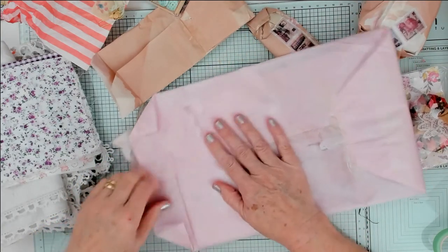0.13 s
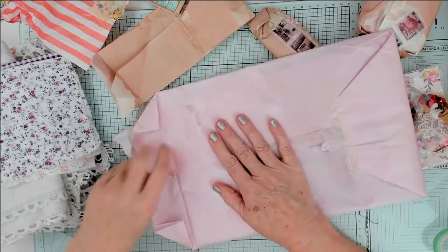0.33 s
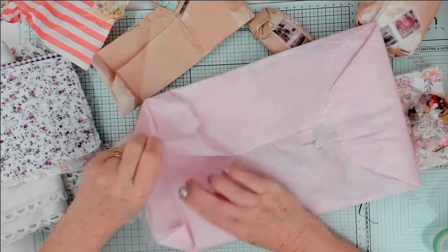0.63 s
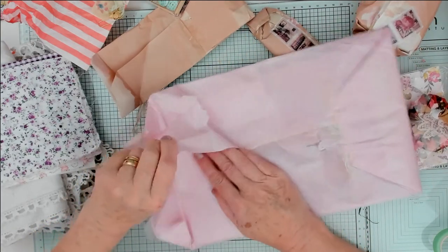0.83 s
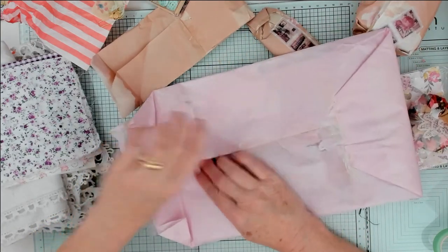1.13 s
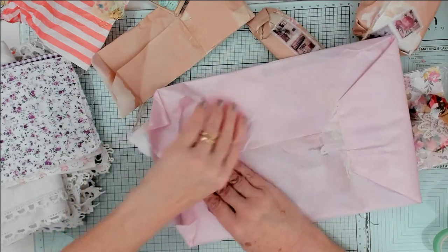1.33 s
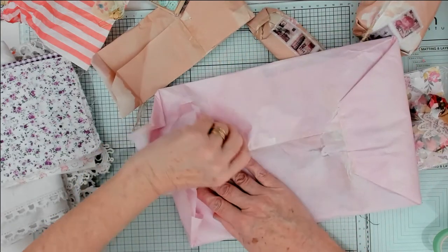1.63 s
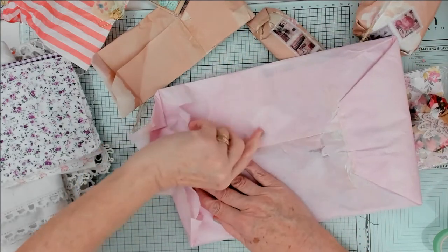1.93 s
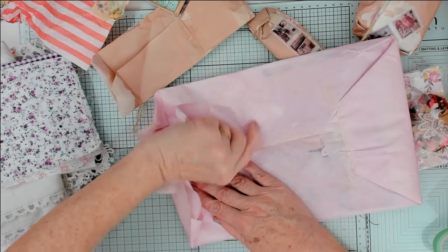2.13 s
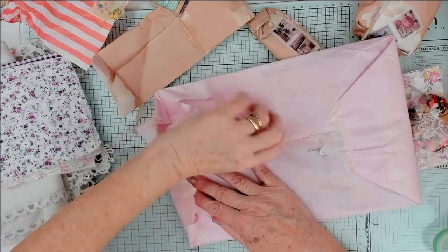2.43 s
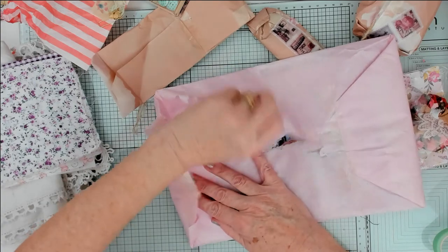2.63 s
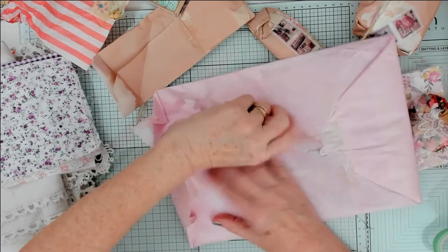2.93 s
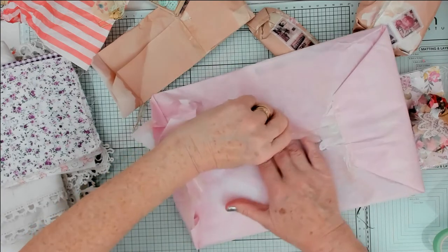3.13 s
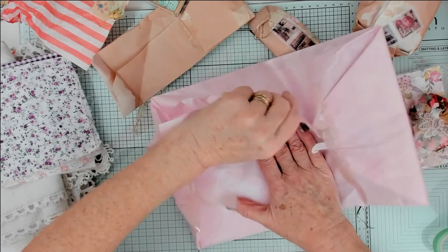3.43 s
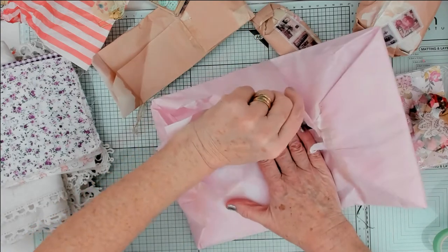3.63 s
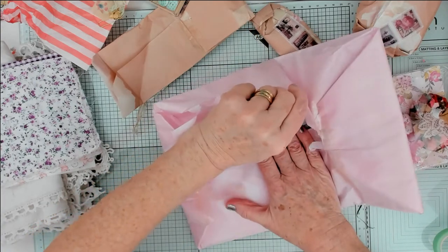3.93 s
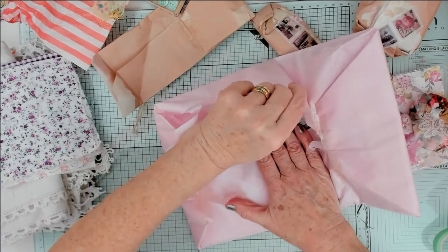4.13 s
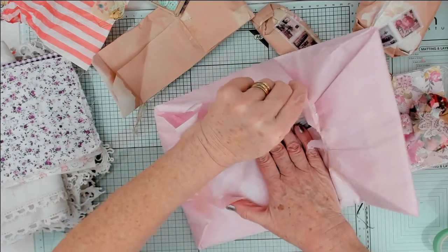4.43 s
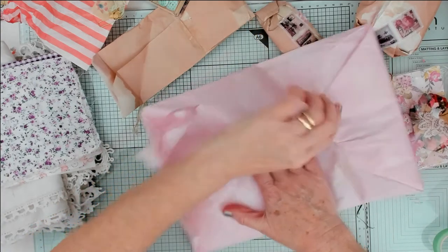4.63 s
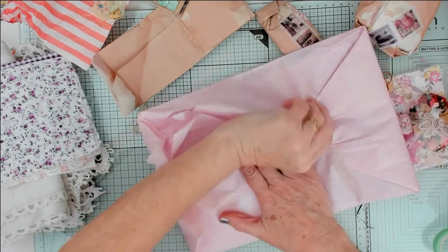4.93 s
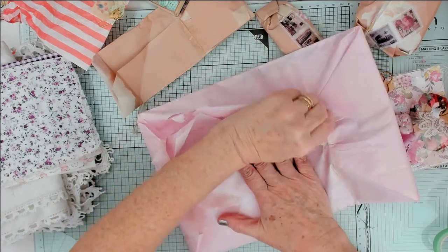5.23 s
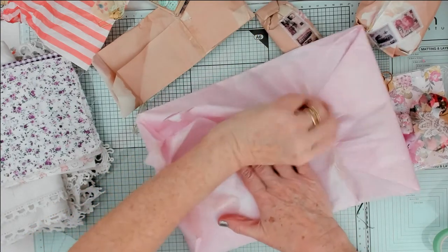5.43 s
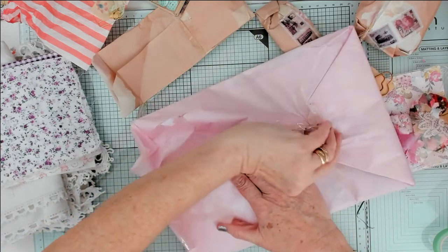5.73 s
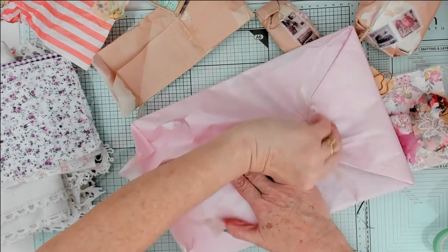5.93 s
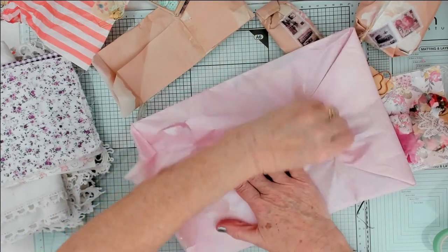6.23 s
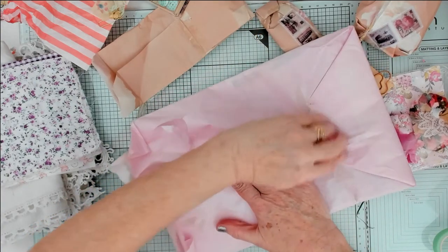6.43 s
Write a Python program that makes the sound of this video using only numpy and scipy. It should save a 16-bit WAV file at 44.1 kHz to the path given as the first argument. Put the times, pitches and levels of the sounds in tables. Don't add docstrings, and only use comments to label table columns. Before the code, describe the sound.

Close, bright tissue-paper crackling as fingers fumble, rip and crease a parcel's wrapping, with low hollow pops underneath in a quiet small room.

```python
import sys
import numpy as np
from scipy import signal
from scipy.io import wavfile
from scipy.ndimage import uniform_filter1d, minimum_filter1d

SR = 44100
rng = np.random.default_rng(int(sys.argv[2]) if len(sys.argv) > 2 else 0)


def field_ratio(decibels):
    return 10 ** (np.asarray(decibels, dtype=float) / 20)


def digitize_waveform(pressure):
    field = np.atleast_2d(pressure).T
    bounded = np.clip(field, -1, 1)
    quanta = np.round(bounded * 32767).astype(np.int16)
    wavfile.write(sys.argv[1], SR, quanta)


N = 290266

# frequency_hz, density_db (per Hz)
SHEET = [(1050, -21), (1450, -16.5), (2500, -0.5), (2950, 0), (7570, -3.5), (10000, -6.5), (16000, -25.5)]
# pitch_hz, width_hz, level_db
PARCEL = [(703, 69, -1), (871, 52, 10.5), (1042, 214, 6), (1667, 143, 8.5), (2460, 265, 4),
          (3950, 190, -10.5)]


def evened(x):
    return x / np.sqrt(np.mean(x ** 2) + 1e-20)


def peaked(x):
    return x / np.sqrt(uniform_filter1d(x ** 2, size=88).max())


def curve(rows):
    s, *columns = np.transpose(rows)
    return [np.interp(np.arange(N) / SR, s, c) for c in columns]


def read(points, hz):
    f, value = np.transpose(points)
    return np.interp(np.log(hz + 1), np.log(f + 1), value)


def colour(x, points, size=1024):
    gain_db = read(points, abs(np.fft.fftfreq(size, 1 / SR)))
    log_gain = np.log(field_ratio(np.maximum(gain_db, -100)))
    response = np.exp(np.conj(signal.hilbert(log_gain)))
    taps = np.fft.ifft(response).real[:size // 2]
    taps = taps.reshape((1,) * (x.ndim - 1) + (-1,))
    return signal.oaconvolve(x, taps, axes=-1)[..., :x.shape[-1]]


def ring(x, hz, width):
    return signal.lfilter(*signal.iirpeak(hz, hz / width, SR), x)


def body(x, modes):
    out = 0
    for k, (hz, width, db) in enumerate(modes):
        out = out + (-1) ** k * field_ratio(db) * ring(x, hz, width)
    return out


def clicks(luck, per_s, spread_db):
    size = field_ratio(-spread_db * np.log(luck[..., 1] + 1 / 100))
    sign = np.sign(luck[..., 2] - 0.5)
    return size * sign * (luck[..., 0] < per_s / SR)


def volley(chance, length, per_s):
    u = np.arange(len(chance)) / SR / np.clip(length, 0.004, 0.1)
    swell = 0.026 + 1 - np.exp(-u / 0.03)
    drive = clicks(chance, per_s, spread_db=3.5) * swell * field_ratio(-60 * u ** 1.38)
    main_s = np.clip(0.06 * length, 0.0012, 0.003)
    drive[round(main_s * SR)] += 5.5
    return drive


def stillness():
    # frequency_hz, density_db (per Hz)
    air_spectrum = [(30, 5), (100, 7.5), (165, -1), (900, 10.5), (3000, 1), (8000, -2.5), (12000, -17),
                    (16000, -28)]
    # time_s, level_db
    hum_course = [(0, -85), (3, -82), (5.8, -81)]
    tone = np.sin(2 * np.pi * 50 * np.arange(N) / SR)
    hum = tone + 1.17 * evened(ring(rng.standard_normal(N), 47.0, 12))
    air = field_ratio(-61) * evened(colour(rng.standard_normal(N), air_spectrum, size=4096))
    return air + field_ratio(curve(hum_course)[0]) * evened(hum)


def room(x):
    # frequency_hz, t60_s
    decay = [(300, 0.19), (1000, 0.11), (3000, 0.085), (10000, 0.078)]
    taps = np.zeros(SR // 2)
    at = np.arange(300, len(taps) - 20, 20)
    taps[at + rng.integers(0, 20, len(at))] = rng.choice([-1.0, 1.0], len(at))
    hz, t, z = signal.stft(taps, SR, nperseg=256)
    fall = field_ratio(-60 * t / read(decay, hz)[:, None])
    tail = signal.istft(z * fall, SR, nperseg=256)[1]
    tail *= field_ratio(-14) / np.linalg.norm(tail)
    tail[0] += 1
    return signal.oaconvolve(x, tail / np.linalg.norm(tail))[:N]


def pops():
    # start_s, level_db,
    # pitch_hz, length_s
    fold_pops = [(0.248, -36.5, 362, 0.066), (0.71, -27, 710, 0.1), (0.967, -28, 674, 0.07),
                 (2.269, -26.5, 440, 0.049), (3.334, -24, 790, 0.078), (3.416, -14.5, 376, 0.022),
                 (3.918, -19.5, 750, 0.12), (4.02, -22.5, 720, 0.042), (4.041, -17.5, 720, 0.026),
                 (4.298, -24.5, 453, 0.035), (4.556, -17, 840, 0.1), (4.816, -28, 394, 0.065),
                 (4.946, -11, 1030, 0.12), (2.835, -32.5, 285, 0.12), (2.977, -38, 385, 0.017),
                 (2.977, -38, 1040, 0.014), (0.15, -54, 305, 0.045), (0.69, -38, 270, 0.13),
                 (1.185, -28.5, 850, 0.11), (3.67, -47, 222, 0.054), (5.669, -30.5, 880, 0.0317)]
    # start_s, level_db, pitch_hz
    knocks = [
        (0.563, -53, 128),
        (0.758, -53, 139),
        (2.84, -50, 113),
        (3.414, -38.5, 106),
        (3.934, -46, 236),
        (4.56, -43, 220),
        (4.784, -37, 210),
        (4.998, -50, 107),
    ]
    rows = list(fold_pops) + [(s, db + 4.0, hz, 0.1) for s, db, hz in knocks]
    out = np.zeros(N + 6000)
    for (s, db, hz, length), chance in zip(rows, rng.random((len(rows), 6000, 3))):
        drive = volley(chance, length, per_s=2800)
        flap = ring(ring(drive, hz, 0.28 * hz), hz, 1.2 * hz)
        out[round(s * SR):][:len(flap)] += field_ratio(db - 6.0) * peaked(flap)
    return out[:N]


def flicks():
    # start_s, level_db
    broad_flicks = [(0.1457, -24.5), (0.487, -28), (0.7478, -11.5), (0.921, -31), (1.2874, -15.5),
                    (1.51, -27), (1.9534, -8), (2.4726, -21), (2.76, -19), (2.9276, -27), (3.1015, -26),
                    (3.2266, -15), (3.9804, -29), (3.9902, -17), (4.1455, -25.5), (4.2484, -18),
                    (4.267, -22), (4.3958, -28.5), (4.5246, -31), (5.2176, -20.5), (5.2486, -25),
                    (5.8736, -29), (5.89, -28), (5.94, -21.5), (6.3334, -32)]
    thin_flicks = [(0.1852, -28), (0.2034, -29), (1.158, -22.5), (1.198, -25), (1.2127, -21), (1.736, -12),
                   (2.0254, -25), (2.4036, -15), (3.899, -22), (4.885, -25), (4.9796, -22), (5.4635, -36),
                   (5.4812, -18.5)]
    lowest_hz = [2300, 5320]
    rows = [(*row, hz) for kind, hz in zip([broad_flicks, thin_flicks], lowest_hz) for row in kind]
    out = np.zeros(N + 900)
    for (s, db, low_hz), chance in zip(rows, rng.random((len(rows), 900, 3))):
        drive = volley(chance, 0.024, per_s=8300)
        pitches = low_hz * 2.53 ** chance[0]
        rings = sum(ring(ring(drive, hz, 0.17 * hz), hz, hz) for hz in pitches)
        sound = peaked(rings) + 0.67 * peaked(colour(drive, SHEET))
        out[round(s * SR):][:len(drive)] += field_ratio(db - 12.0) * peaked(sound)
    return out[:N]


def buckles():
    # start_s, level_db, pitch_hz
    hollow = [(0.2607, -33, 1680), (0.7479, -30, 1640.0), (1.2308, -24, 1330), (1.2764, -27, 2070),
              (1.3969, -23, 2020.0), (1.4049, -35, 1940.0), (1.5086, -25, 2170), (1.5744, -28, 2220),
              (1.8228, -33, 1660.0), (1.895, -18.5, 1580), (1.9587, -19.5, 1530.0), (2.1554, -15.5, 2320),
              (2.6164, -15, 1960), (3.0016, -33, 2240.0), (3.0406, -20, 2170), (3.117, -34, 2300),
              (3.1427, -23, 1710), (3.3279, -22, 1690), (3.3721, -11, 1610), (3.3897, -11, 2230),
              (3.4506, -21, 1640.0), (3.7961, -34, 2000.0), (4.299, -18, 1445), (4.6617, -32.5, 1720.0),
              (4.9445, -25, 1710), (5.1401, -28, 1490.0), (5.4281, -33, 1690), (5.4488, -29, 1600),
              (5.5139, -32, 1480), (6.025, -20.5, 1950), (6.054, -26, 1510), (6.0768, -26.5, 1700.0),
              (6.1966, -31, 2020.0), (6.2251, -28, 1490), (6.3967, -28, 1460)]
    slack = [(0.3904, -34, 3320.0), (0.5384, -21.5, 3330), (0.5609, -13.5, 2320), (0.586, -25, 4410.0),
             (0.605, -21.5, 3440), (0.6516, -26.5, 2370.0), (1.01, -26, 2850), (1.07, -29, 2360),
             (1.251, -32, 2300), (1.3002, -34, 2840.0), (1.318, -27, 2690.0), (1.339, -25.5, 2370),
             (1.4673, -37, 3360.0), (1.5593, -29, 2480.0), (1.6404, -9.5, 2590), (1.6887, -25, 2430.0),
             (2.1804, -17.5, 3880.0), (2.221, -21, 3470.0), (2.373, -33, 3060.0), (2.4381, -34, 3660.0),
             (2.518, -35.5, 2480), (2.6504, -11.5, 2270), (2.7967, -31, 2350), (2.9566, -30, 2710.0),
             (3.201, -28, 2620), (3.2316, -33, 4010.0), (3.309, -23, 2970.0), (3.3187, -31, 3940.0),
             (3.325, -23.0, 3830.0), (3.537, -26, 2350), (3.6393, -37, 3120.0), (3.922, -25.5, 3430),
             (4.113, -29, 3200), (4.1794, -31, 3360), (4.2057, -32, 3350), (4.5573, -32, 3830.0),
             (4.6802, -29, 2950.0), (4.706, -26, 2430.0), (4.7708, -22.5, 2540), (4.8249, -22, 3440),
             (4.9447, -25, 4410.0), (4.979, -29, 4220), (5.067, -28, 2550), (6.1358, -24.5, 3220),
             (6.216, -37, 3640.0), (6.306, -34, 3490.0), (6.5367, -35.5, 3680)]
    taut = [(0.2474, -21.5, 8050), (0.6024, -25, 8400.0), (0.6316, -21, 6870.0), (0.6944, -34, 7860.0),
            (0.7636, -22.5, 7410.0), (1.228, -25, 6290.0), (1.2647, -29, 8510.0), (1.318, -30, 6630.0),
            (1.5607, -26, 7150), (1.5763, -25.5, 10400), (1.738, -37, 4570.0), (1.874, -31, 6910.0),
            (1.917, -14, 6460), (1.9606, -20, 4570.0), (1.983, -13, 5200), (2.0085, -19, 6760),
            (2.2684, -20, 9860.0), (2.3078, -23.5, 9710.0), (2.334, -19, 5600.0), (2.41, -17, 6550),
            (2.6275, -12, 7600.0), (2.6595, -14, 8600), (2.676, -21.5, 7950.0), (2.739, -30, 4650.0),
            (2.8101, -22, 4600), (3.3742, -13, 7200), (3.5563, -21, 6500.0), (3.6406, -30, 8290.0),
            (3.6522, -30, 8160.0), (3.7, -29, 8070.0), (3.816, -36, 12000), (3.752, -28, 5600),
            (3.76, -31, 9390.0), (4.1927, -35, 12400), (4.2407, -28, 6200), (4.292, -29, 7240.0),
            (4.6298, -27, 6700), (4.7932, -21, 6120.0), (5.0123, -20, 7200), (5.05, -28, 6940),
            (5.0803, -31, 6780.0), (5.3859, -18.5, 4930), (5.5328, -17.5, 7900), (5.627, -27, 5960),
            (5.8265, -29, 5000.0), (5.832, -33, 7690.0), (6.0548, -37, 7750.0)]
    lengths = [0.014, 0.028, 0.011]
    widths = [0.095, 0.11, 0.18]
    rows = [(*row, *rule) for kind, *rule in zip([hollow, slack, taut], lengths, widths) for row in kind]
    out = np.zeros(N + 900)
    for (s, db, hz, length, width), chance in zip(rows, rng.random((len(rows), 900, 3))):
        drive = volley(chance, length, per_s=8300)
        sound = peaked(ring(drive, hz, width * hz)) + field_ratio(-13) * peaked(colour(drive, SHEET))
        out[round(s * SR):][:len(drive)] += field_ratio(db - 0.5) * peaked(sound)
    return out[:N]


def hands():
    # peak_s, rustle_db, parcel_db (re rustle), build_s, fade_s
    pulls = [(0, -31.5, -6.5, .05, 0.089), (.577, -29, -3, 0.047, 0.24), (.774, -31, 2, 0.24, 0.054),
             (1.005, -34.5, -4.5, 0.086, 0.1), (1.346, -34.5, -2.5, 0.19, 0.059),
             (1.463, -37, -4.5, 0.19, 0.97), (1.65, -22.5, -5.5, 0.022, 0.028),
             (1.999, -22, -2.5, 0.058, 0.037), (2.11, -31.5, -12, 0.005, 0.1),
             (2.169, -22, -6.5, 0.073, 0.24), (2.413, -35, -4, 0.54, 0.067),
             (2.604, -19.5, -16, 0.011, 0.093), (2.646, -16.5, 0, 0.069, 0.093),
             (2.833, -34, 3.5, 0.16, 0.087), (3.29, -25, -19, 0.041, 0.35), (3.363, -30.5, 6.5, 0.18, 0.24),
             (3.542, -31, -3.5, 0.25, 0.11), (4.309, -37, -17, 0.12, 0.12), (4.584, -34.5, 3, 0.1, 0.31),
             (5.009, -28, 5, 0.15, 0.048), (5.557, -32.5, -4, 0.061, 0.034), (6.038, -31, -6, 0.071, 0.25)]
    # peak_s, rustle_db, parcel_db (re rustle), build_s, fade_s
    more_pulls = [(.259, -40.5, -21, 0.14, 0.18), (.441, -35, -23, 0.095, 0.045),
                  (.859, -38, 0.5, 0.12, 0.049), (1.225, -32, -1.5, 0.057, 0.21), (1.75, -40, 1, 0.27, 0.72),
                  (2.035, -36, 0, .05, 0.035), (2.99, -43, -10, 0.12, 0.22), (6.3, -42, 4.5, 0.12, 0.093),
                  (3.153, -41, 1, 0.069, 0.63), (3.69, -37, -6.5, 0.22, 0.3), (3.831, -36, -11, 0.31, 0.063),
                  (3.933, -39, 5, 0.049, 0.059), (4.035, -37, -7, 0.13, 0.051),
                  (4.14, -38, -12, 0.062, 0.024), (4.186, -39.5, -8.5, 0.012, 0.25),
                  (5.07, -34.5, -0.5, 0.13, 0.22), (5.397, -38, -1, 0.016, 0.26),
                  (5.83, -45.5, -4.5, 0.059, 0.17), (5.958, -39, -6.5, 0.038, 0.38),
                  (.968, -32.5, -3.5, 0.012, 0.16), (1.13, -37, -8, .12, 0.074),
                  (4.885, -42, 5, 0.027, 0.046), (6.42, -38, 4, 0.053, 0.05),
                  (6.532, -42.5, -2.5, 0.018, 0.037)]
    t = np.arange(0, N + 64, 64) / SR
    s, db, parcel_db, build, fade = np.transpose(list(pulls) + list(more_pulls))[:, :, None]
    span = np.where(t < s, np.maximum(build, 0.005), np.maximum(fade, 0.005))
    away = abs(t - s) / span
    loss_db = 21 * away ** np.where(t < s, 1.5, 1.7)
    rustle_db = (db - loss_db).max(0)
    ring_db = (db + parcel_db - 1.53 * loss_db).max(0)
    still_db = -65
    return curve(np.transpose([t, *np.maximum((rustle_db, ring_db), still_db)]))


def parcel(drive):
    spot = rng.integers(0, 4, N // 1024 + 1).repeat(1024)[:N]
    out = np.zeros(N)
    for k, luck in enumerate(rng.random((4, len(PARCEL)))):
        modes = [(hz * (1 + 0.16 * (p - 0.5)), width, db - 6 * p)
                 for (hz, width, db), p in zip(PARCEL, luck)]
        out += body(drive * (spot == k), modes)
    return evened(out)


def rustle():
    # pitch_hz, width_hz, level_db
    table_modes = [(216, 26, -3), (349, 196, -1), (446, 153, 0.5)]
    db, parcel_db = hands()
    per_s = np.minimum(5500 * field_ratio(0.7 * (db + 34.5)), 18000)
    lumpy_db = np.interp(db, [-30, -18], [1.9, 1.2])
    clumps = field_ratio(lumpy_db * evened(uniform_filter1d(rng.standard_normal(N), size=200)))
    drive = clicks(rng.random((N, 3)), per_s, spread_db=2.0) / np.sqrt(per_s) * clumps

    patch = rng.integers(0, 8, N // 128 + 1).repeat(128)[:N]
    mood = field_ratio(3.5 * rng.standard_normal((N // 3000 + 1, 8)).repeat(3000, axis=0)[:N])
    rings = np.zeros(N)
    for k, hz in enumerate(np.geomspace(2800, 13000, 8)):
        rings += ring(drive * (patch == k) * mood[:, k], hz, 0.2 * hz)
    sheet = evened(colour(drive + 2.0 * rings, SHEET))
    dull = signal.lfilter(*signal.butter(2, 6000, fs=SR), sheet)
    bright = dull + field_ratio(np.minimum(0.26 * (db + 32.0), 1.5)) * (sheet - dull)

    table_db = np.minimum(parcel_db, -33.0) - 18.0
    table = field_ratio(table_db) * evened(body(body(drive, table_modes), table_modes))
    return field_ratio(db) * bright + field_ratio(parcel_db - 0.5) * parcel(drive) + table


def snaps():
    # start_s, level_db, parcel_db (re full contact), length_s
    loose_ticks = [(0.024, -14.5, -31, 0.031), (0.19, -17, -20, 0.02), (0.2447, -13.5, -15, 0.039),
                   (0.258, -17, -13.5, 0.062), (0.4303, -14, -17.5, 0.018), (0.5358, -6.5, -17.5, 0.036),
                   (0.5635, -1, -9, 0.037), (0.7073, -6, -27, 0.022), (1.099, -18, -27, 0.017),
                   (1.3014, -10.5, -23, 0.0067), (1.6367, 4, -10, 0.064), (1.75, -3.5, -6, 0.018),
                   (1.8413, -12.5, -9, 0.059), (2.5629, -10, -7.5, 0.021), (2.901, -16.5, -32, 0.019),
                   (3.205, -19, -23, 0.0058), (3.959, -17, -28, 0.019), (3.9992, -12, -4.5, 0.019),
                   (4.113, -24.5, -14, 0.025), (4.4059, -24.5, -13, 0.03), (4.6766, -13, -25, 0.038),
                   (5.5336, -12, -8, 0.018), (5.6261, -50, -28, 0.015), (5.8312, -10, -21, 0.017),
                   (5.8495, -19, -2, 0.024), (5.9478, -17, -25, 0.017), (6.0335, -7, 0, 0.014),
                   (6.5178, -18.5, -11, 0.02), (6.5294, -20.5, 0.5, 0.023)]
    lying_snaps = [(0.1117, -28, -4, 0.097), (0.7314, -12, 2.5, 0.012), (0.8573, -18.5, -3, 0.026),
                   (1.617, -9.5, -8, 0.034), (2.34, -7, -8, 0.027), (2.4054, -11.5, -6, 0.044),
                   (3.1407, -7.5, -5.5, 0.034), (3.1764, -14.5, -1.5, 0.022), (3.2275, -17, 3, 0.029),
                   (3.35, -2, 1, 0.048), (3.4153, 0, -3, 0.034), (3.5375, -4.5, -22, 0.025),
                   (3.5837, -13, -6.5, 0.048), (3.6716, -11, 0, 0.032), (3.8289, -19.5, 7.5, 0.05),
                   (4.2983, -6, -6.5, 0.022), (4.577, -9, 3, 0.0297), (4.7508, -13.5, 0, 0.016),
                   (4.819, -7.5, -1, 0.035), (4.8638, -15, -7, 0.046), (4.957, -8.5, -19, 0.026),
                   (5.0099, 0.5, -4, 0.017), (5.1123, -12.5, -8, 0.017), (5.1727, -16.5, 0, 0.027),
                   (5.2341, -20.5, -2.5, 0.017), (5.381, -17.5, 12.5, 0.026), (5.4036, -10.5, -26, 0.012),
                   (5.4913, -15, 0.5, 0.022)]
    crumples = [(0.627, -19.5, 7.5, 0.034), (1.2171, -20, 5, 0.17), (1.8947, -8, -1.5, 0.12),
                (2.107, -20.5, 1.5, 0.018), (2.2682, -8, 2, 0.17), (2.6773, -5, -3.5, 0.079),
                (3.2854, -16, -3, 0.15), (3.3878, 2, -19, 0.027), (3.5281, -4.5, -5, 0.04),
                (3.7187, -17, -12, 0.023), (3.7799, -18, -7, 0.061), (3.934, -14, -12, 0.038),
                (4.207, -22, -21, 0.014), (4.773, -17.5, 4.5, 0.12), (4.914, -13.5, 1, 0.024),
                (5.126, -16.5, 0.5, 0.046), (6.0185, -17, -8.5, 0.14), (6.1351, -17, 1, 0.12),
                (6.2563, -14, -9, 0.036)]
    scuffs = [(0.3514, -21.5, -31, 0.055), (0.395, -14, -20, 0.033), (0.445, -14, -12.5, 0.028),
              (1.0196, -12.5, -4.5, 0.02), (1.527, -9.5, -11.5, 0.049), (1.872, -13.5, -7, 0.15),
              (1.9162, 0.5, -29, 0.058), (1.9474, -4, -27, 0.0048), (2.1817, 0, -28, 0.007),
              (2.4797, -18.5, -11, 0.077), (2.829, -6.5, -9, 0.051), (2.957, -14.5, -8, 0.016),
              (4.0946, -26, -6, 0.013), (4.1872, -15.5, -8.5, 0.024), (4.272, -15, -22, 0.015),
              (4.7209, -11, -2, 0.034), (5.2608, -18, -5.5, 0.024), (5.7947, -18.5, -9.5, 0.026),
              (5.8135, -19, -10, 0.07), (5.923, -19.5, -18, 0.012)]
    thuds = [(0.8882, -19, 6, 0.027), (1.395, -17, -12, 0.03), (1.4467, -6.5, -5, 0.035),
             (1.4798, -9.5, -7, 0.011), (1.6658, -6, -5, 0.031), (1.6889, -12, -11, 0.035),
             (1.9007, -7.5, -0.5, 0.021), (1.959, -9, -14, 0.02), (2.249, -14, 5, 0.024),
             (2.771, -13, 4, 0.016), (2.977, -10, -1.5, 0.023), (3.04, -26.5, 3, 0.021),
             (3.208, -9, -4.5, 0.012), (3.3687, -10, 4, 0.0076), (3.491, 0, -3.5, 0.028),
             (3.546, -11, 4, 0.037), (4.019, -26, 4, 0.024), (4.0429, -23, 5, 0.027),
             (4.224, -21, -15, 0.012), (4.5034, -42, 22, 0.024), (4.5403, -18, -0.5, 0.027),
             (4.6996, -14.5, 4, 0.016), (4.8358, -11, 4.5, 0.036), (5.6678, -31, -8, 0.025),
             (5.9571, -11, -11, 0.017), (6.1816, -18.5, 1, 0.073), (6.4043, -8, 0, 0.029)]
    crisp_levels = [0.5, -0.5, 0, -9.5, -9]
    kinds = [loose_ticks, lying_snaps, crumples, scuffs, thuds]
    rows = [(*row, crisp_db) for kind, crisp_db in zip(kinds, crisp_levels) for row in kind]
    luck, patch = rng.random((len(rows), 2600, 3)), rng.random((len(rows), 3 + len(PARCEL)))
    low, high = signal.butter(3, 7000, fs=SR), signal.butter(3, 7000, "high", fs=SR)
    shallow = signal.butter(3, 620, "high", fs=SR)
    crease_db, lying_db = -14.5, 2.5
    out = np.zeros(N + 2600)
    for (s, db, parcel_db, length, crisp_db), chance, place in zip(rows, luck, patch):
        drive = volley(chance, length, per_s=11000)
        rings = sum(ring(drive, hz, 0.56 * hz) for hz in 2800 * 3.67 ** place[:3])
        sheet = colour(drive + 1.8 * rings, SHEET)
        modes = [(hz, width, mode_db - 9 * p) for (hz, width, mode_db), p in zip(PARCEL, place[3:])]
        hollow = signal.lfilter(*shallow, body(drive, modes))
        sound = peaked(signal.lfilter(*low, sheet))
        sound += field_ratio(crisp_db) * peaked(signal.lfilter(*high, sheet))
        sound += field_ratio(parcel_db + lying_db) * peaked(hollow)
        out[round(s * SR):][:len(drive)] += field_ratio(db + crease_db) * sound
    return out[:N]


def scene():
    paper = snaps() + rustle() + buckles() + flicks()
    thin = signal.lfilter(*signal.butter(3, 200, "high", fs=SR), paper)
    return (room(thin + pops()) + stillness())[None]


def band_limit(x):
    return signal.sosfilt(signal.butter(12, 16510, fs=SR, output="sos"), x)


def record(dry):
    edge = signal.firwin(255, 15700, window=("kaiser", 7), fs=SR)
    wide = signal.oaconvolve(dry, edge[None], "same")
    room_left = np.minimum(0.9 / (abs(wide) + 1e-9), 1)
    limited = wide * uniform_filter1d(minimum_filter1d(room_left, size=128), size=64)
    return band_limit(limited)


dry = scene()
out = record(dry)
digitize_waveform(out)
```